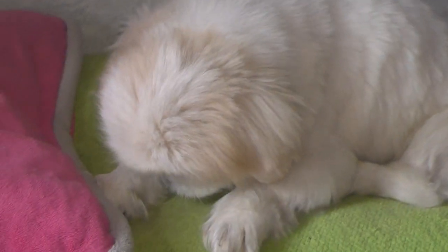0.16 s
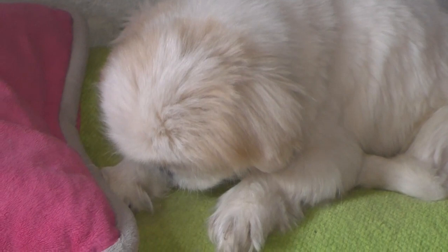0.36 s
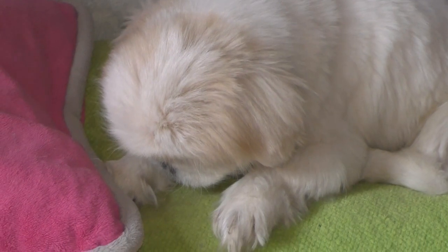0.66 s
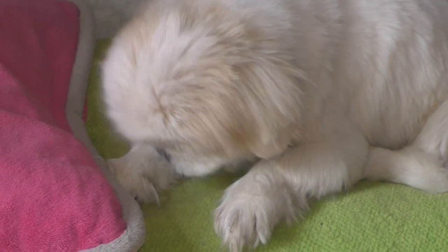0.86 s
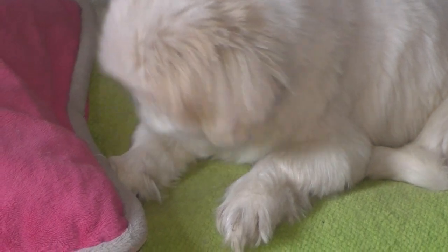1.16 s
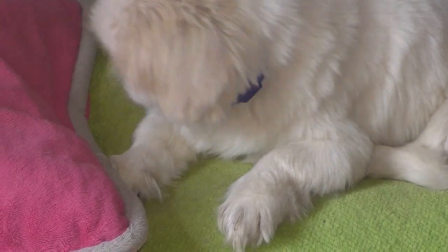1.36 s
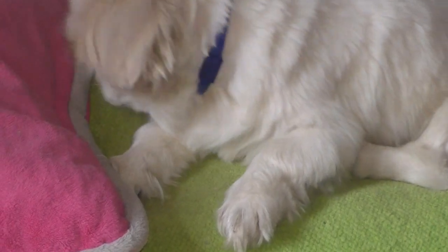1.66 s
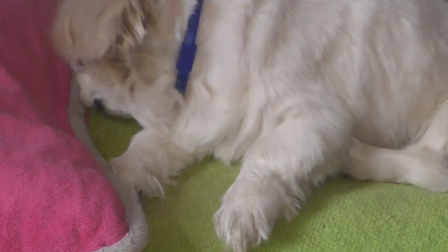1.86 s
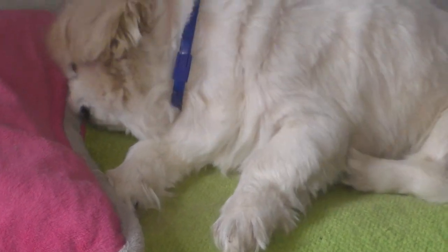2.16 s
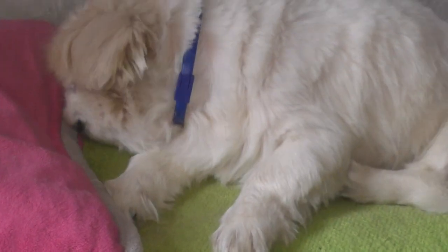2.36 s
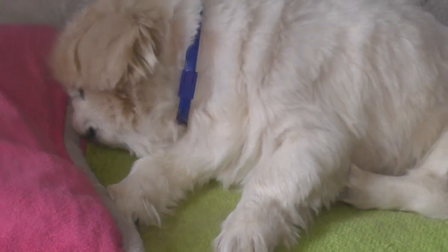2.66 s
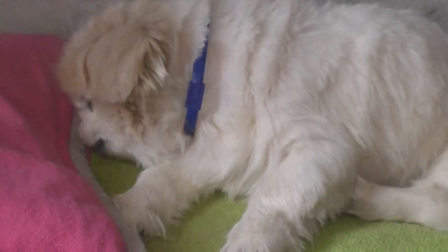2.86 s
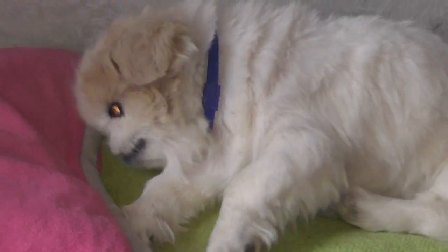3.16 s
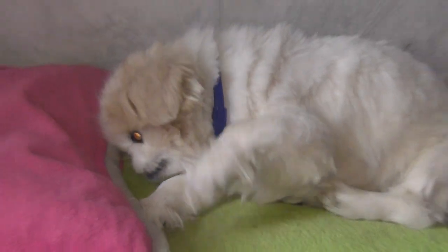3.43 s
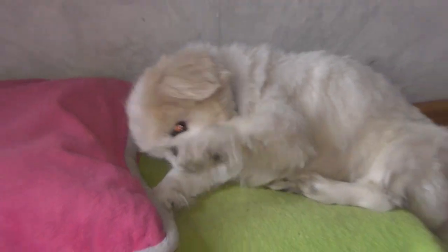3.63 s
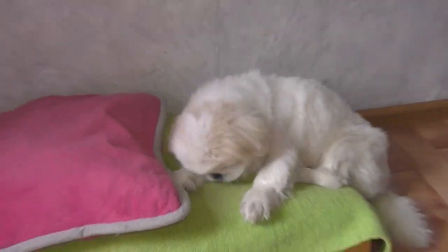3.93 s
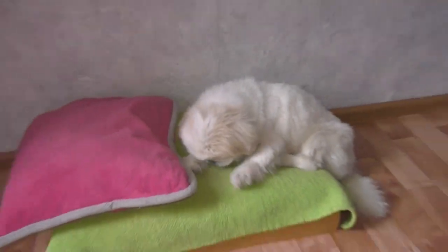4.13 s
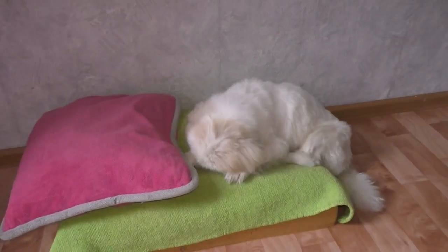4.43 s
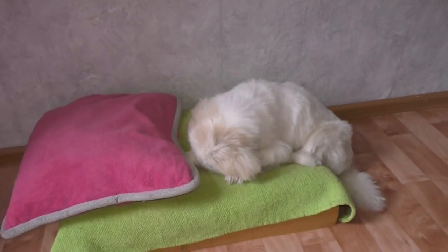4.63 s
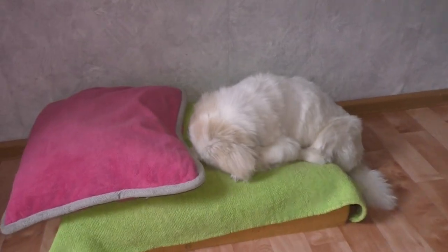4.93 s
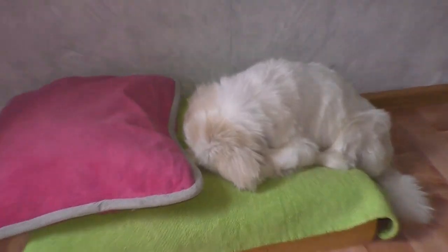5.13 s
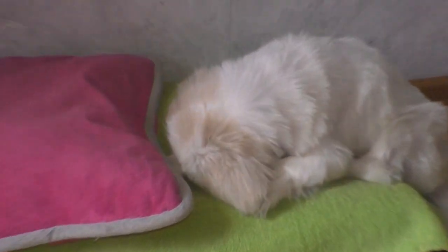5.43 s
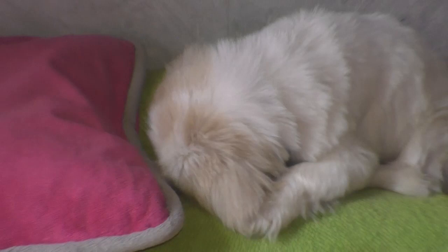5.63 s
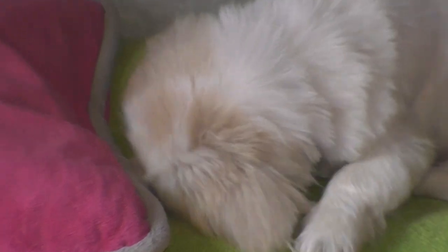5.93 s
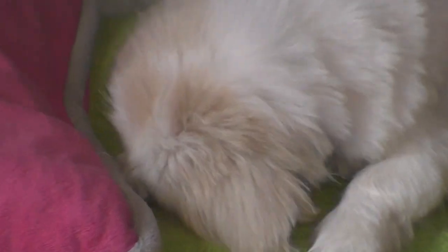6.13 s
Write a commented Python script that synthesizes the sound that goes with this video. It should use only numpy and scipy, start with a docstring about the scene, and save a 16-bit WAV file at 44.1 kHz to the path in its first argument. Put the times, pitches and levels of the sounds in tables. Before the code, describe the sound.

For the first 0.4 seconds a small dog gives a soft, airy snuffle with a thin nose whistle. At about 0.5 seconds it starts chewing and tearing a paper napkin: a dense, crisp crackle of breaking fibres in quick, irregular tugs, with sharp snaps as creases buckle and a dull crumple of the wad against jaw and bedding. After a strong tug around 0.7 seconds it eases briefly near 1 second, then resumes and is loudest around 2.3 to 2.6 seconds. Teeth give tiny squeaks on the paper near 0.7, 2.5, 2.8, 3 and 4.5 seconds. There is another short lull around 4 seconds, then rapid bites continue, a little lighter after 5.7 seconds, until the end at about 6.3 seconds. The dog is close and slightly to the right, in a bare room with a very short echo and a faint steady hush.

```python
"""A soft airy snuffle comes first, from a small dog on a blanket in a bare room, close to a stereo pair.
Then it chews and tears at a paper napkin held in its paws: fibres break in a dense crackle, creases
buckle with sharp snaps, teeth squeak on the paper, and the wad crumples dully against jaw and bedding.
The nearby wall and floor give the cracks a short tail, over a faint room tone."""
import sys
import numpy as np
from scipy import signal
from scipy.fft import rfft, irfft
from scipy.io import wavfile
from scipy.ndimage import uniform_filter1d

SR = 44100
rng = np.random.default_rng(int(sys.argv[2]) if len(sys.argv) > 2 else 0)


def put_to_file(sound):
    """Save the sound as 16-bit audio at rate SR, in the file named by the first command-line argument."""
    columns = np.atleast_2d(sound).T  # one column per channel
    safe = np.clip(columns, -1, 1)
    whole_steps = np.round(safe * 32767)
    wavfile.write(sys.argv[1], SR, whole_steps.astype(np.int16))


N = 277389
TIME = np.arange(N) / SR
CUTOFF_HZ = 16000


def from_db(db):
    """Decibels to gain."""
    return 10 ** (np.asarray(db) / 20)


def rms_one(x):
    """Scale so that the middle of the stereo picture has rms 1."""
    return x / np.sqrt(np.mean(np.atleast_2d(x).mean(axis=0) ** 2) + 1e-20)


def in_time(rows):
    """One curve per column after the time, with a value for every sample."""
    times, *columns = np.transpose(rows)
    return [np.interp(TIME, times, column) for column in columns]


def at_hz(points, hz):
    """Read a table on a log-frequency axis."""
    f, value = np.transpose(points)
    return np.interp(np.log(np.maximum(hz, 1)), np.log(f), value)


def drift(per_s):
    """A random wander of rms 1 that takes per_s new values a second."""
    knots = rng.standard_normal(N // 40)
    return rms_one(np.interp(TIME * per_s, np.arange(len(knots)), knots))


def colour(x, spectrum):
    """Causal (minimum-phase) filter with the given spectrum."""
    size = 4096
    gain = from_db(at_hz(spectrum, np.fft.rfftfreq(size, 1 / SR)))
    cepstrum = irfft(np.log(gain))
    cepstrum[1:size // 2] *= 2
    cepstrum[size // 2 + 1:] = 0
    impulse = irfft(np.exp(rfft(cepstrum)))
    return signal.fftconvolve(np.atleast_2d(x), impulse[None], axes=1)[:, :N]


def resonance(x, hz, width_hz):
    """Two-pole resonance with gain 1 at its peak."""
    r = np.exp(-np.pi * width_hz / SR)
    feedback = [1, -2 * r * np.cos(2 * np.pi * hz / SR), r * r]
    return signal.lfilter(np.array([1, 0, -1]) * (1 - r * r) / 2, feedback, x)


def shelf(x, kind, hz, db):
    """Raise or lower everything below ("low") or above ("high") a corner."""
    return x + (from_db(db) - 1) * signal.sosfilt(signal.butter(1, hz, kind, fs=SR, output="sos"), x)


# Diffuse sound at the two microphones: f/Hz, left-right likeness (capped at 0.99 in use)
MIC_LIKENESS = [(60, 0), (110, 0), (180, 0.3), (300, 1), (750, 0.5), (1300, .7), (3300, 0.42), (5500, 0.3),
                (9000, 2.04), (15000, 6)]


def stereo_noise(size):
    """White noise, as alike at the two microphones as sound arriving from all sides."""
    mid, side = rfft(rng.standard_normal((2, size)))
    alike = np.clip(at_hz(MIC_LIKENESS, np.fft.rfftfreq(size, 1 / SR)), 0, .99)
    return irfft(np.sqrt(1 + alike) * mid + np.sqrt(1 - alike) * side * [[1], [-1]], size)


# Spectrum of the quiet room: f/Hz, relative level/dB
ROOM_TONE = [(25, -8.5), (60, -4), (150, -3), (320, -1.5), (550, -14), (1000, -8), (2500, -7), (4000, -15),
             (6000, -25.5), (12000, -17.5), (16000, -19.5)]


def room_tone():
    """A faint, steady hush from all around the microphones."""
    return from_db(-61.5) * rms_one(colour(stereo_noise(N), ROOM_TONE))


# Decay of the bare room: f/Hz, time to fall by 60 dB/s
ROOM_DECAY = [(150, 0.097), (1500, 0.21), (5000, 0.18), (14000, 0.13)]


def room_response(wet_db, aside_db=0):
    """Direct sound, then reflections that start sparse, thicken and ring longest in the middle range."""
    size = 8192
    t, hz = TIME[:size], np.fft.rfftfreq(size, 1 / SR)
    density = np.clip(.12 + t / .03, .01, 1)
    arrivals = rfft(stereo_noise(size) * (rng.random(size) < density) / np.sqrt(density) * (t > .0007))
    edges_hz = [0, 700, 2000, 4000, 8000, SR]
    tail = 0
    for low, high in zip(edges_hz, edges_hz[1:]):
        t60 = at_hz(ROOM_DECAY, min((low + high) / 2, CUTOFF_HZ))
        band = irfft(arrivals * (hz >= low) * (hz < high))
        tail = tail + band * np.exp(-np.log(1000) * t / t60)
    pan = from_db([[aside_db], [-aside_db]])
    return pan * ((t == 0) + from_db(wet_db) * rms_one(tail) / np.sqrt(size))


def room(x, wet_db):
    """Cracks come from ever different spots on the napkin, each with its own pattern of reflections."""
    count, slice_size, fade_size = 5, 110, 40
    spot = np.repeat(rng.integers(0, count, N // slice_size + 1), slice_size)[:N]
    out = 0
    for k, aside_db in enumerate(0.35 * np.linspace(-1, 1, count)):   # from right to left
        here = x * uniform_filter1d((spot == k) * 1., fade_size)
        out = out + signal.oaconvolve(here[None], room_response(wet_db, aside_db), axes=1)[:, :N]
    return out


# The dog's place, a little right of the pair: f/Hz, left minus right level/dB
MIC_BALANCE = [(60, -1.5), (450, 1.1), (760, -2), (1220, -3.5), (2010, -3.5), (3330, -3.5), (5500, -0.5),
               (7600, 0.7), (8600, -3), (9600, 0), (15000, -2.5)]


def microphone_pair(x):
    """Each microphone gets half of the level difference."""
    return np.vstack([colour(channel, [(hz, side * db / 2) for hz, db in MIC_BALANCE])
                      for channel, side in zip(x, (1, -1))])


# The opening breath: t/s, relative hiss level/dB, relative flutter level/dB
BREATH = [(0, -51.5, -50.5), (.11, -57, -58.5), (.23, -55.5, -67), (.3, -55, -79), (.375, -64, -66),
          (.4, -78, -82), (.45, -110, -110)]
# Resonances of the muzzle: f/Hz, width/Hz, relative level/dB
MUZZLE = [(1000, 150, -3), (1390, 300, 0.5), (2170, 220, 0), (2770, 330, -2.5), (4000, 1000, -3),
          (6650, 1100, -7.5)]
# Thin whistle of the nose: t/s, f/Hz, level/dB
NOSE_WHISTLE = [(0, 2120, -61), (.1, 2120, -65), (.2, 2190, -62.5), (.3, 2220, -65), (.37, 2270, -65),
                (.41, 2240, -90), (.45, 2260, -120)]
# The two nostrils: ratio to the whistle's pitch, relative level/dB
NOSTRILS = [(1, 2), (1.29, -3)]


def snuffle():
    """Air passes the dog's short muzzle with a soft hiss, a raspy whistle and a low flutter."""
    hiss_db, flutter_db = in_time(BREATH)
    whistle_hz, whistle_db = in_time(NOSE_WHISTLE)
    air = stereo_noise(N) * from_db(drift(104))
    hiss = sum((-1) ** k * from_db(db) * resonance(air, hz, width)
               for k, (hz, width, db) in enumerate(MUZZLE))
    whistle = 0
    for ratio, db in NOSTRILS:
        rasp = from_db(db) * drift(260)
        nostril_hz = ratio * whistle_hz + 70 * drift(350)
        whistle = whistle + rasp * np.sin(2 * np.pi * np.cumsum(nostril_hz) / SR)
    tremble = 1 + .3 * drift(70)
    flutter_hz = 200 * (1 + .04 * drift(60))
    flutter = tremble * np.sin(2 * np.pi * np.cumsum(flutter_hz) / SR)
    return (from_db(hiss_db - 9) * rms_one(hiss) + from_db(whistle_db) * rms_one(whistle)
            + from_db(flutter_db - 8) * rms_one(flutter))


# Teeth skidding on the paper: t/s, length/s, f/Hz, level/dB
TOOTH_SKIDS = [(0.741, 0.0079, 1950, -30.5), (2.514, 0.042, 1850, -29), (2.788, 0.021, 3000, -37.5),
               (2.997, 0.012, 2350, -37), (4.463, 0.0044, 2040, -35.5)]


def squeaks():
    """Paper sticks and slips on a tooth, singing unsteadily for a moment."""
    out = 0
    for start_s, length_s, hz, level_db in TOOTH_SKIDS:
        swell = np.sqrt(np.clip(1 - (2 * (TIME - start_s) / length_s - 1) ** 2, 0, 1))
        phase = 2 * np.pi * np.cumsum(hz * (1 + 0.12 * drift(900))) / SR
        out = out + from_db(level_db + 1.2 * drift(320)) * swell * np.sin(phase)
    return signal.oaconvolve(out[None], room_response(wet_db=-11), axes=1)[:, :N]


# The napkin rustling in the mouth between tugs: t/s, sheet level/dB
RUSTLE = [(.434, -85), (.47, -53), (.8, -53), (1.05, -61), (1.19, -58), (1.36, -50), (1.95, -52),
          (2.85, -48.5), (3.2, -56), (3.55, -51), (4.07, -58), (4.3, -50), (5.4, -50), (5.87, -54.5),
          (6.29, -55)]
# Each bite or tug: t/s, swell/s, hold/s, sheet level/dB, wad re sheet/dB, fibres re sheet/dB
TUGS = [(0.479, .012, 0.02, -45.5, -3.5, -14), (0.607, 0.077, 0.16, -37, -10, -1.5),
        (1.208, 0.04, 0.15, -40, -9.5, -2), (1.427, 0.063, 0.013, -40.5, -10.5, -2.5),
        (1.522, 0.024, 0.24, -47.5, -14.5, -1), (1.805, 0.021, 0.018, -40, -20, -4.5),
        (1.9, 0.019, 0.012, -50, -13, 9), (1.977, 0.042, 0.034, -40, -15, -4),
        (2.087, 0.056, .13, -39, -11.5, -1), (2.345, 0.11, 0.052, -34.5, -15, -2),
        (2.48, 0.045, 0.057, -33.5, -12, -2), (2.769, 0.01, .09, -50, -9, -8),
        (3.069, 0.021, 0.072, -46, -12, 1), (3.227, 0.0061, 0.044, -43.5, -11.5, 1),
        (3.25, 0.035, 0.044, -40.5, -14.5, 0.5), (3.349, 0.0078, 0.043, -41.5, -17, 2.5),
        (3.468, 0.0085, 0.11, -58, -26, 8), (3.637, 0.034, 0.013, -39, -16, -6.5),
        (3.78, 0.0088, 0.04, -44.5, -17.5, 1.5), (3.852, 0.016, 0.021, -49, -9, -6),
        (4.156, 0.019, 0.039, -41, -10, 2), (4.337, 0.023, 0.058, -43, -11.5, -2),
        (4.399, 0.037, 0.047, -42.5, -9, 3), (4.565, .03, 0.098, -43.5, -9.5, -.5),
        (4.699, 0.0077, 0.066, -41, -14.5, 3), (4.806, 0.02, .045, -38.5, -10, -2),
        (4.931, 0.028, .03, -45, -11, -0.5), (5.095, 0.015, 0.048, -46, -10.5, 1),
        (5.156, 0.053, 0.018, -42.5, -12, 0), (5.337, 0.014, 0.018, -56.5, -18, 8),
        (5.523, 0.012, .025, -39.5, -6.5, -4), (5.566, .02, .04, -41.5, -12, -4.5),
        (5.655, 0.025, 0.062, -46, -10, -9.5), (5.89, 0.016, .05, -48, -9, -0.5),
        (6.017, 0.054, 0.075, -52, -11, 3.5), (6.189, 0.077, 0.012, -41.5, -12, 1)]


def tugging():
    """Levels of sheet, wad and fibres in dB: every tug swells, holds and dies away over the rustle."""
    swell_db, release_db_per_s = 16.5, 255.5
    rustle_db, = in_time(RUSTLE)
    power = from_db(rustle_db + np.array([[0], [-9.5], [-7]])) ** 2   # sheet, wad, fibres
    power[2] *= from_db(.3 * (rustle_db - rustle_db.mean())) ** 2   # a louder rustle is brighter
    for start_s, swell_s, hold_s, sheet_db, wad_db, fibre_db in TUGS:
        age = TIME - start_s
        rise_db = swell_db * np.minimum(age / swell_s - 1, 0)
        shape_db = rise_db - release_db_per_s * np.maximum(age - swell_s - hold_s, 0)
        heard = shape_db > -60
        layers_db = sheet_db + np.array([[0], [wad_db], [fibre_db]])
        power[:, heard] += from_db(layers_db + shape_db[heard]) ** 2
    return 10 * np.log10(power)


def fractures(per_s, spread_db=4.5, clump_db=5.5):
    """Tiny random breaks, mostly small, coming in clumps as one fibre takes its neighbours along."""
    born = rng.random(N) < per_s * from_db(clump_db * drift(140)) / SR
    return born * rng.choice([-1, 1], N) * from_db(spread_db * np.minimum(rng.exponential(1, N), 4.5))


def facets(clicks, low_hz, high_hz, width_share):
    """Each break shakes one facet of the crumpled paper, which rings briefly at its own pitch."""
    count = 14
    facet = rng.integers(0, count, N)
    return sum(resonance(clicks * (facet == k) + 1e-18, hz, width_share * hz) / np.sqrt(hz)
               for k, hz in enumerate(np.geomspace(low_hz, high_hz, count)))


def follow_pull(grains, level_db, span_s):
    """Grains keep their fine unevenness while their overall strength follows the dog's pull."""
    power, size = grains.mean(axis=0) ** 2, int(span_s * SR)
    slow_power = uniform_filter1d(uniform_filter1d(power, size), size)
    return grains / np.sqrt(np.maximum(slow_power, 0) + 1e-3 * power.mean()) * from_db(level_db)


# Dull crumple of the wad against jaw and bedding: f/Hz, relative level/dB
WAD_COLOUR = [(30, -21), (70, -17.5), (120, -12), (190, -5), (300, 1.5), (400, 1), (490, -0.5), (620, -7),
              (780, -7), (1000, -25), (1500, -55)]
# Crackle of the sheet: f/Hz, relative level/dB
SHEET_COLOUR = [(500, -18.5), (780, -35.5), (900, -4.5), (1050, -2), (1300, -1), (1800, 0), (2500, -1),
                (3600, -2.5), (4500, -8.5), (6500, -43.5)]
# Fine tearing of fibres: f/Hz, relative level/dB
FIBRE_COLOUR = [(2200, -17), (3400, 1), (4300, 0), (5500, -2.5), (7500, -3.5), (10500, -2), (13000, -6),
                (15500, -11)]
# Tone as the head moves before the microphones: t/s, wad bass gain/dB, top treble gain/dB
HEAD_TONE = [(.5, 9, -1.5), (.7, 2, 4), (.88, 30, -8), (1.45, 11, 3), (2.15, -5, -6), (2.6, -2, 3.5),
             (2.85, 8.5, -8), (3.35, -5, -3), (3.7, 1, 7.5), (4.25, -8, -2.5), (4.85, -7.5, 4.5),
             (5.3, -2, -2), (5.6, -2, -5), (6.29, -1, -5)]


def chewing(sheet_db, wad_db, fibre_db):
    """Breaks sound in wad, sheet and torn edge; a harder pull brings more and brightens the sheet."""
    bass_db, top_db = in_time(HEAD_TONE)
    pull_db = sheet_db - np.median(sheet_db)
    pace = from_db(.5 * pull_db)
    breaks = fractures(per_s=1100 * pace)
    fine_breaks = breaks + from_db(-1) * fractures(per_s=900 * pace)
    wad = colour(room(breaks, wet_db=10), WAD_COLOUR)
    wad = shelf(wad, "low", 360, bass_db)
    sheet = facets(breaks, 866, 5200, width_share=0.45)
    sheet = colour(room(sheet, wet_db=4), SHEET_COLOUR)
    sheet = shelf(sheet, "low", 1500, -0.4 * pull_db)
    fibres = facets(fine_breaks, 4250, CUTOFF_HZ, width_share=0.48)
    fibres = colour(room(fibres, wet_db=2.5), FIBRE_COLOUR)
    fibres = shelf(fibres, "high", 9400, top_db)
    return (follow_pull(wad, wad_db + 0.18, span_s=0.04)
            + follow_pull(sheet, sheet_db - .2, span_s=0.046)
            + follow_pull(fibres, fibre_db - .2, span_s=0.034))


def small_creases(sheet_db):
    """Small creases give way by chance, as strong as the pull allows: rows for snaps() to play."""
    count, per_s = 400, 14
    above_sheet_db, hz, stutter_s = 5.5, 4000, 0.00068
    moments = np.cumsum(rng.exponential(1, count)) / per_s
    scatter = np.clip(rng.standard_normal((count, 3)), -2, 2)
    return [(s, sheet_db[int(s * SR)] + above_sheet_db + db, hz * 2 ** (.4 * pitch),
             stutter_s * 2 ** length)
            for s, (db, pitch, length) in zip(moments, scatter) if s < TIME[-1]]


# The big creases buckling: t/s, relative level at the onset/dB, centre f/Hz, stutter time/s
BIG_CREASES = [(.4553, -42, 2450, 0.0012), (.484, -38, 3050, 0.0015), (.638, -39.5, 5400, 0.0022),
               (.677, -33, 4300, 0.0014), (.6988, -28.5, 7850, 0.0014), (.7984, -26, 6400, 0.00054),
               (.9742, -51, 2270, .0008), (1.1361, -46.5, 1680, 0.00068), (1.2439, -29, 5030, 0.00062),
               (1.2814, -32, 4000, 0.0022), (1.3744, -35, 4700, 0.0015), (1.439, -32.5, 3500, 0.0022),
               (1.4796, -26.5, 5130, 0.0022), (1.5929, -33, 4100, 0.00032), (1.6481, -29, 5770, 0.0012),
               (1.7167, -37, 8500, 0.00023), (1.7635, -25, 8300, 0.00015), (2.0516, -29.5, 5500, .0009),
               (2.1043, -32, 4050, 0.0023), (2.392, -24, 5100, 0.00015), (2.536, -27.5, 3600, .001),
               (2.5554, -25, 3010, 0.0013), (2.7066, -37, 4000, 0.00059), (2.7903, -26.5, 7200, 0.001),
               (2.8259, -36, 3797, 0.0018), (2.9088, -38, 2640, 0.0022), (3.0011, -34.5, 3600, .0018),
               (3.0496, -27.5, 5840, 0.0013), (3.0977, -31.5, 4900, 0.002), (3.131, -34.5, 4150, .00075),
               (3.229, -35.5, 3350, 0.0019), (3.301, -26.5, 4540, 0.0012), (3.3664, -27.5, 8200, 0.0015),
               (3.3733, -28, 5800, 0.0023), (3.5059, -32.5, 7350, .0012), (3.6686, -28.5, 5540, 0.00057),
               (3.7603, -39.5, 2160, 0.0023), (3.7929, -31.5, 5300, 0.00076), (4.074, -39, 6000, 0.00059),
               (4.1221, -29, 6520, 0.00096), (4.4537, -29, 5530, .0003), (4.5675, -30.5, 4400, 0.00063),
               (4.6178, -28.5, 3700, 0.00036), (4.707, -30.5, 4360, 0.00087), (4.8262, -29, 4950, 0.002),
               (4.8673, -32, 7600, 0.0016), (5.0656, -37.5, 4450, 0.00083), (5.0987, -33, 3430, 0.00054),
               (5.2189, -33, 6120, .0009), (5.3511, -40.5, 4900, 0.0017), (5.3975, -38, 4120, 0.0023),
               (5.5322, -25, 4450, 0.00066), (5.5364, -25, 3560, .0012), (5.6265, -30, 4000, 0.0013),
               (5.8933, -41, 4400, 0.0011), (5.9937, -43.5, 2400, 0.00062), (6.1263, -26.5, 4900, 0.00022),
               (6.2649, -33.5, 4900, 0.0011)]
# Tone shared by all snaps: f/Hz, gain/dB
SNAP_COLOUR = [(60, -7), (300, -17), (480, 7.5), (720, -4), (1050, 9), (2000, 4.5), (4000, -1), (7000, -5),
               (11000, 1), (15500, -2)]


def snaps(creases):
    """A crease gives way in a stutter of cracks that swells and dies: a tick if short, a crunch if long."""
    size, peak_span = 800, 100   # samples
    direct, room_send = np.zeros((2, N + size))
    noises = rng.standard_normal((len(creases), 2, size))
    for (start_s, level_db, hz, stutter_s), (cracks, strengths) in zip(creases, noises):
        age = TIME[:size] / (.5 * stutter_s)
        stutter = cracks * from_db(3.2 * strengths) * (age + 0.13) * np.exp(-age)
        snap = resonance(stutter, hz, 0.96 * hz)   # the crease's size sets the pitch
        snap *= from_db(level_db) / np.sqrt(uniform_filter1d(snap ** 2, peak_span).max())
        send_db = -.6 * np.log2(stutter_s / 0.0011)   # short cracks send more into the room
        at = int(start_s * SR)
        direct[at:at + size] += snap
        room_send[at:at + size] += snap * from_db(send_db)
    reflections = room(room_send[:N], wet_db=2.5) - room_send[:N]
    sound = colour(direct[:N] + reflections, SNAP_COLOUR)
    _, top_db = in_time(HEAD_TONE)
    return from_db(0.78) * shelf(sound, "high", 11500, 0.42 * top_db)


def scene():
    """The dog lies close to the microphones and a little to the right, over the hush of the room."""
    hush = room_tone()
    sheet_db, wad_db, fibre_db = tugging()
    dog = chewing(sheet_db, wad_db, fibre_db) + squeaks() + snuffle()
    dog += snaps(BIG_CREASES + small_creases(sheet_db))
    return hush + microphone_pair(dog)


def record(dry):
    """A steep low-pass after the microphones cuts the very top."""
    return signal.sosfilt(signal.ellip(10, .2, 70, CUTOFF_HZ, fs=SR, output="sos"), dry)


dry = scene()
out = record(dry)
put_to_file(out)
```